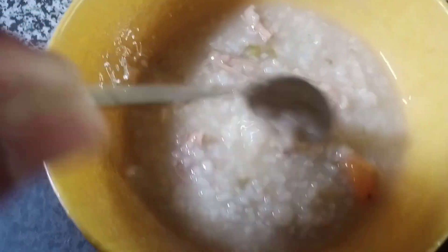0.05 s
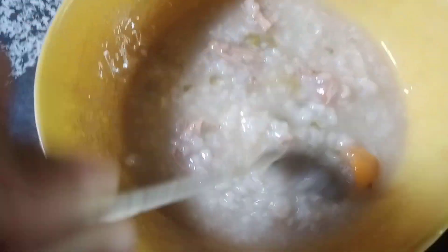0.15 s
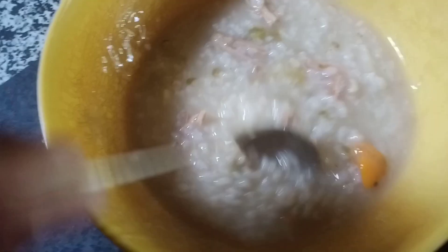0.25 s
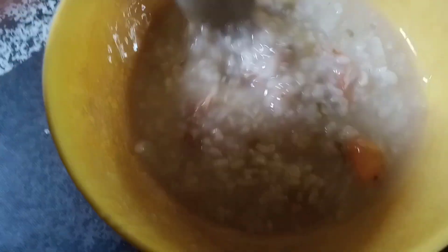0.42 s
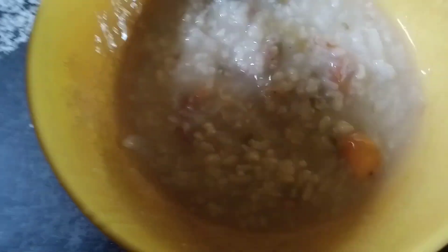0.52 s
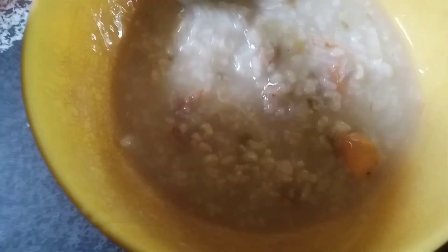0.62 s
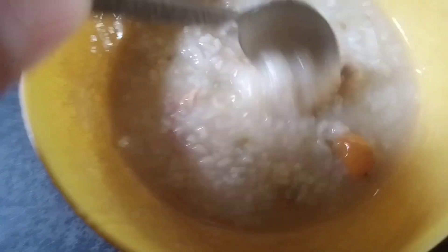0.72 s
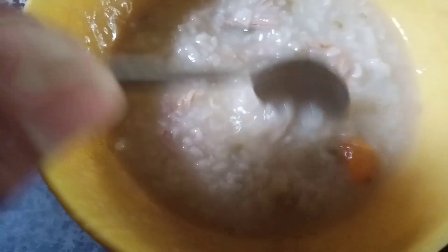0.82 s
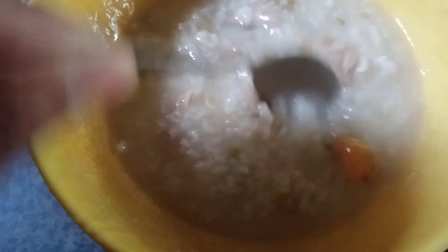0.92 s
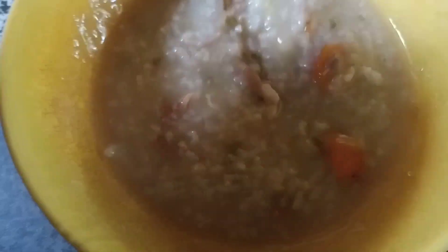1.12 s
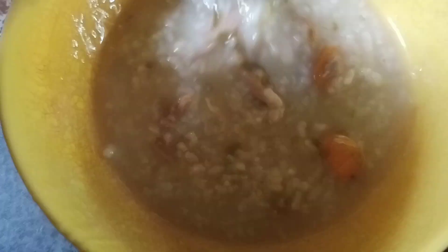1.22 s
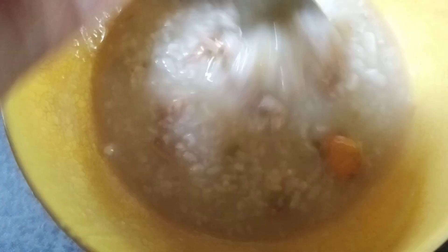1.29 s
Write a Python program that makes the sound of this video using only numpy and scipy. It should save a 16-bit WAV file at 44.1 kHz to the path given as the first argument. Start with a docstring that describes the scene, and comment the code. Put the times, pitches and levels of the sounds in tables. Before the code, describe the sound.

A metal spoon stirs thick rice porridge: faint wet hiss, a sharp short clack on the bowl with a quick rattle and scrape, light touches, then a second knock; close microphone, small kitchen, low motor hum.

```python
"""Throughout, a kitchen hums as shaped noise and a motor buzzes faintly as a sum of wavering sine tones.
Wet hiss, grainy filtered noise, swells early on and returns now and then until the end. At 0.21 s a steel spoon
knocks on a bowl of rice porridge, chatters, bounces and drags; faint touches follow at 0.58 s, a second knock
at 0.91 s. Contacts and slips excite the same short modes, damped by the food; a small room answers them."""
import sys
import numpy as np
from scipy import signal
from scipy.fft import rfft, irfft
from scipy.io import wavfile
from scipy.ndimage import uniform_filter1d

SR = 44100
rng = np.random.default_rng(int(sys.argv[2]) if len(sys.argv) > 2 else 0)


def decibels_to_gain(level_db):
    """Convert a level in decibels to a linear amplitude gain (20 dB per decade)."""
    exponent = np.asarray(level_db, float) / 20
    return 10 ** exponent


def unload_audio(sound):
    """Save the sound as a 16-bit wav file, at the path given as the first command line argument."""
    columns = np.transpose(np.atleast_2d(sound))
    # keep every value between -1 and 1, then stretch to whole-number steps
    steps = np.round(np.clip(columns, -1, 1) * 32767)
    wavfile.write(sys.argv[1], SR, steps.astype(np.int16))


N = 59535  # length [samples]


def read(points, hz):
    """Spectral interpolation: levels in dB are joined by straight lines over log frequency."""
    f, value = np.transpose(points)
    return np.interp(np.log(hz + 1), np.log(f + 1), value)


def evened(x):
    """Power normalisation: scales a signal to rms 1."""
    return x / np.sqrt(np.mean(x ** 2) + 1e-20)


def coloured(x, points):
    """Linear filtering: each frequency is multiplied by the gain read from a spectrum table."""
    hz = np.fft.rfftfreq(len(x), 1 / SR)
    return irfft(rfft(x) * decibels_to_gain(read(points, hz)), len(x))


# spectral density of the kitchen hum, before scaling: (frequency [Hz], relative level per hertz [dB])
KITCHEN_SPECTRUM = [(20, -60), (35, -32), (60, -12), (105, 1.5), (160, -4.5), (220, -3.5), (400, -12.5),
                    (700, -17), (1100, -13), (1620, -17.5), (2440, -14), (3200, -13), (4000, -19.5),
                    (4700, -28), (5500, -21.5), (7300, -20), (8500, -26.5), (9700, -36.5), (13000, -34),
                    (15400, -34), (15700, -63), (16500, -70)]
KITCHEN_DB = -50.5  # rms level of the whole hum
PATCHY_DB, SWELL_DB, LUMPY_DB = 1.5, 1.23, 1.5  # rms level fluctuations


def kitchen():
    """Random-phase noise: Gaussian short-time spectra fluctuate in level, the low rumble more lumpily."""
    frames = N // 256 + 5
    hz = np.fft.rfftfreq(1024, 1 / SR)[:, None]
    real, imaginary, patches = rng.standard_normal((frames, 513, 3)).T
    patches = uniform_filter1d(patches, size=8, axis=0)  # smooth over frequency
    patches = evened(uniform_filter1d(patches, size=10, axis=1))  # smooth over time
    swell = evened(uniform_filter1d(rng.standard_normal(frames), 30))
    lumps = evened(uniform_filter1d(rng.standard_normal(frames), 4))
    db = read(KITCHEN_SPECTRUM, hz) + PATCHY_DB * patches + SWELL_DB * swell
    db += LUMPY_DB * lumps / (1 + (hz / 500) ** 2)
    spectra = (real + 1j * imaginary) * decibels_to_gain(db)
    hum = signal.istft(spectra, nperseg=1024, noverlap=768)[1][:N]
    return decibels_to_gain(KITCHEN_DB) * evened(hum)


# motor harmonics: (multiple of twice the mains rate, rms level before wavering [dB])
BUZZ_HARMONICS = [(4, -68), (10, -67), (11, -73), (12, -70), (14, -72), (18, -69), (24, -67), (25, -69),
                  (28, -73), (51, -79), (72, -73), (74, -76), (75, -77)]
# separate motor whines: (frequency [Hz], rms level before wavering [dB])
WHINES = [(156, -70.5), (3241, -69.5), (3262, -68.5), (3531, -71), (3634, -79), (4081, -73), (5600, -75)]
TWICE_MAINS_HZ, WAVER_DB = 100.66, 3.5


def buzz():
    """Additive synthesis: steady-pitched harmonics and whines of a motor, each wavering in level."""
    t, out = np.arange(N) / SR, np.zeros(N)
    harmonics = [(multiple * TWICE_MAINS_HZ, db) for multiple, db in BUZZ_HARMONICS]
    for hz, db in harmonics + list(WHINES):
        waver = np.interp(t, np.linspace(0, N / SR, 24), rng.standard_normal(24))
        tone = np.sin(2 * np.pi * (hz * t + rng.random()))
        out += np.sqrt(2) * decibels_to_gain(db + WAVER_DB * waver) * tone
    return out


# the spoon moving through the food: (middle [s], half-length to 1/e of the amplitude [s], peak level [dB])
SQUELCH_SWELLS = [(.07, 0.012, -57), (.102, .002, -50), (.112, 0.014, -60), (.145, 0.033, -62),
                  (0.296, 0.031, -64), (0.586, .006, -55), (0.935, 0.016, -59), (1.06, .004, -72),
                  (1.09, 0.029, -61.5)]
# spectrum of the wet hiss, before scaling: (frequency [Hz], relative level [dB])
WET_SPECTRUM = [(3500, -34), (5500, -1), (8000, 4), (10000, -10), (12500, -2), (15300, -6), (16000, -40)]


def squelch():
    """Amplitude-modulated noise: grainy treble hiss under Gaussian swells as the spoon moves in the food."""
    t = np.arange(N) / SR
    level = sum(decibels_to_gain(db) * np.exp(-((t - middle) / half) ** 2) for middle, half, db in SQUELCH_SWELLS)
    grain = evened(uniform_filter1d(rng.standard_normal(N), size=60))
    hiss = rng.standard_normal(N) * decibels_to_gain(2.2 * grain)
    return level * evened(coloured(hiss, WET_SPECTRUM))


# modes of spoon and bowl together: (frequency [Hz], 60 dB decay time [s], level at spot 0 low on the wall [dB],
# level at spot 1 high on the wall [dB], level at spot 2 under the food [dB])
MODES = [(228, 0.052, -28.5, -50, -30), (544, .028, -21, -19, -12), (887, .028, -17.5, -15, -11),
         (1297, 0.011, -5.5, -28, -18), (1508, .013, -4, -2, -9), (1840, .012, 0.5, -18, -13),
         (2044, 0.0094, -5, -11.5, -14), (2566, 0.0058, -10, -14.5, -14), (2762, 0.0076, 5, -18.5, -13),
         (2892, .013, -12, 0, 0.5), (3437, .011, -14, -8.5, -23), (3918, 0.01, -7.5, -6.5, -19),
         (4170, 0.0077, -13, -6, -26), (4526, 0.0094, -10.5, -4.5, -24), (5350, .009, -23, -13, -8.5),
         (5850, 0.0081, -26, -16, -9), (6440, .007, -30, -16, -14), (7480, 0.0071, -42, -19.5, -22),
         (7900, 0.0077, -38, -18.5, -16), (8520, 0.0073, -34, -19.5, -24)]
RISE_S = 0.0001  # time constant of the onset


def ring(t, spot, hardness_db):
    """Modal superposition: damped sines after a contact at t = 0; neighbours start in opposite directions."""
    hz, t60 = np.transpose(MODES)[:2, :, None]
    t = np.maximum(t, 0)
    sign = (-1.) ** np.arange(len(MODES))[:, None]
    db = np.array([[np.interp(spot, (0, 1, 2), mode[2:])] for mode in MODES])
    db += hardness_db * np.log2(hz / 2800)  # a harder contact tilts the spectrum upward
    decay = 1000. ** (-t / t60)
    swing = sign * decibels_to_gain(db) * decay * np.sin(2 * np.pi * hz * t)
    return swing.sum(0) * (1 - np.exp(-t / RISE_S))


# knocks, bounces and light touches: (time [s], level [dB], spot [0 to 2], hardness [dB per octave])
CONTACTS = [(0.212, -42, 0.54, 4), (.21388, -14.5, 0, -1), (.2146, -2, 0.015, -1), (0.2169, -18.5, 0.14, 2),
            (.2198, -14, 0.064, -1), (.2210, -19.5, 0.07, 0), (.2233, -25.5, 0, 3), (.2320, -32, 0.042, -6),
            (.2400, -35, .2, 3), (.2450, -36, 0.41, -6), (.2510, -34, 0, -5), (.2812, -33, 1.8, -1.5),
            (.2968, -38, 2, 0.5), (.2986, -37, 2, 0), (.3003, -26.5, 1.3, 0), (.3103, -36.5, 1.8, 3),
            (.5812, -38.5, 2.3, 3), (.5915, -41, 2.2, 2.5), (.9131, -13, 1.03, 4), (.91413, -5, 1.07, 2.5),
            (.91618, -17.5, 0.83, 2), (.9230, -25, 0.43, 0), (0.9266, -36, 0.31, -3), (.9463, -35, 1, 1.5),
            (0.9493, -23, 0.72, 1), (.9530, -30, 1, 1), (0.964, -43, 0.59, -5.5)]
# spectrum of the crack at each contact: (frequency [Hz], gain [dB])
CRACK_SPECTRUM = [(300, -42), (1000, -6.5), (3000, 10), (8000, -5), (10000, -16), (15500, -18),
                  (16300, -24), (16500, -60)]
CRACK_DB, CRACK_T60_S = -12.5, 0.0076  # level against the contact, before hardness; 60 dB decay time


def taps():
    """Impact excitation: every contact rings the modes and gives a short bright crack of noise."""
    out, crack = np.zeros(N), np.zeros(N)
    for time, db, spot, hardness_db in CONTACTS:
        at = int(time * SR) + 1 + np.arange(3000)
        t = at / SR - time  # keeps the contact's timing between samples
        out[at] += decibels_to_gain(db) * ring(t, spot, hardness_db)
        crack[at] += decibels_to_gain(db + CRACK_DB + 2 * hardness_db) * 1000. ** (-t / CRACK_T60_S)
    return out + coloured(crack * rng.standard_normal(N), CRACK_SPECTRUM)


ROOM_T60_S = 0.16


def room(x):
    """Statistical reverberation: convolution with sparse reflections of random sign that die away."""
    tail = np.zeros(16000)
    slots = np.arange(120, 15970, 22)
    at = slots + rng.integers(0, 22, len(slots))
    tail[at] = rng.choice([-1., 1.], len(at)) * 1000. ** (-at / SR / ROOM_T60_S)
    return signal.fftconvolve(x, tail / np.linalg.norm(tail))[:N]


# the spoon dragging on the glaze: (spot [0 to 2], level curve as (time [s], level [dB]))
DRAG_CURVES = [(0.22, [(.218, -35), (.235, -40), (.26, -46), (.28, -50.5), (.3, -63)]), (2, [(.27, -59),
               (.292, -47.5), (.3, -42.5), (.315, -53), (.33, -62)]), (2.3, [(.579, -65), (.583, -47),
               (.593, -50), (.598, -69)]), (0.93, [(.917, -46), (.93, -44.5), (.943, -46), (.951, -46),
               (.96, -63), (.98, -78)])]
SLIPS_PER_S, SLIP_SPREAD_DB = 5000, 3.  # mean rate; scale of the exponential spread


def drags():
    """Frictional excitation: random uneven slips drive the same modes."""
    t, out = np.arange(N) / SR, np.zeros(N)
    slips = (rng.random(N) < SLIPS_PER_S / SR) * rng.choice([-1, 1], N)
    strength = decibels_to_gain(SLIP_SPREAD_DB * np.minimum(rng.exponential(1, N), 4))
    slips = evened(slips * strength)
    for spot, level in DRAG_CURVES:
        body = ring(t[:3000], spot, 0)
        force = decibels_to_gain(np.interp(t, *np.transpose(level), left=-150, right=-150))
        out += signal.oaconvolve(slips * force, body / np.linalg.norm(body))[:N]
    return out


LOW_CUT_HZ, ROOM_DB = 225, -22.5  # bass limit of the spoon and bowl; room gain


def scene():
    """Linear superposition: spoon and bowl, too small to radiate bass, with their room, over the kitchen."""
    background = kitchen() + buzz() + squelch()
    low_cut = signal.butter(2, LOW_CUT_HZ, "high", fs=SR, output="sos")
    spoon = signal.sosfilt(low_cut, taps() + drags())
    mix = background + spoon + decibels_to_gain(ROOM_DB) * room(spoon)
    return mix[None]  # one channel


def band_limit(x):
    """A steep low-pass at the top of the band."""
    return signal.sosfilt(signal.butter(12, 16420, fs=SR, output="sos"), x)


def record(dry):
    """Amplitude limiting: the converter clips at full scale."""
    finished = np.clip(dry, -1, 1)
    return band_limit(finished)


dry = scene()
out = record(dry)
unload_audio(out)
```